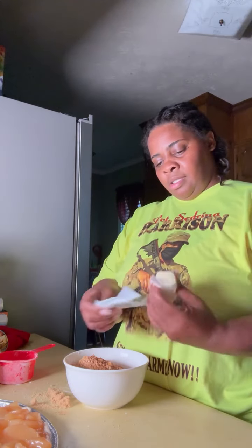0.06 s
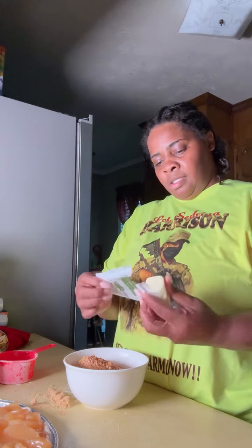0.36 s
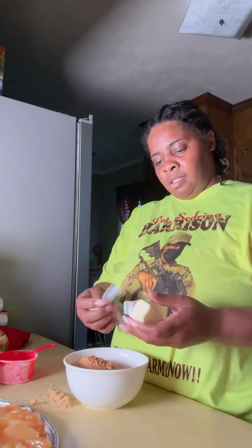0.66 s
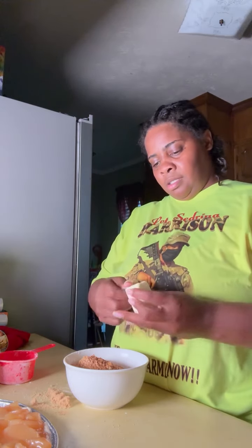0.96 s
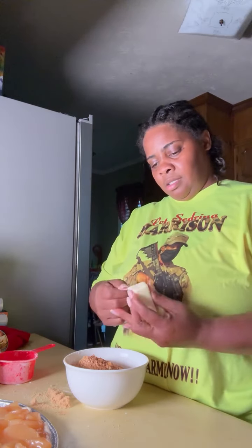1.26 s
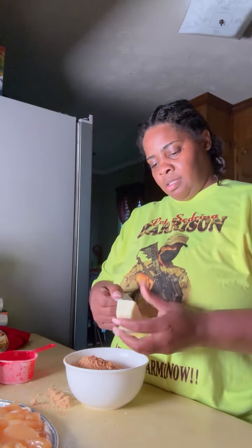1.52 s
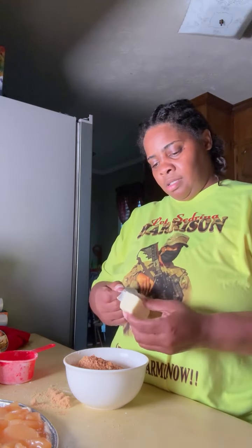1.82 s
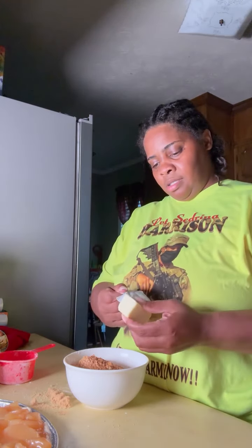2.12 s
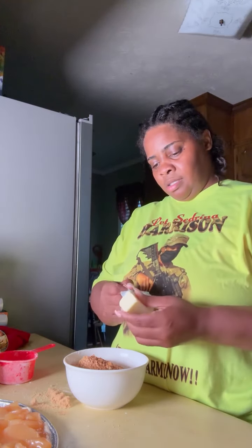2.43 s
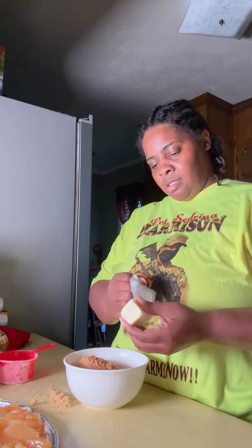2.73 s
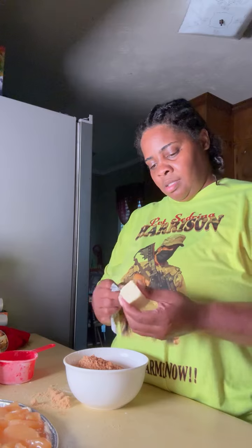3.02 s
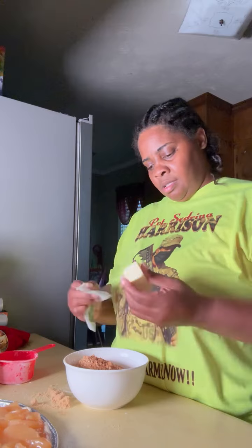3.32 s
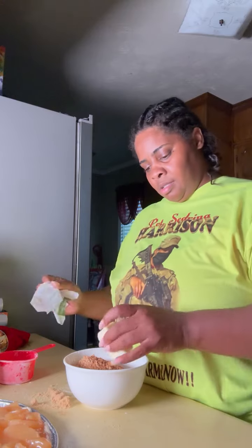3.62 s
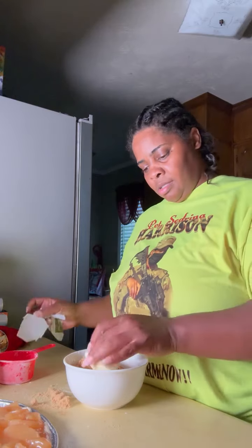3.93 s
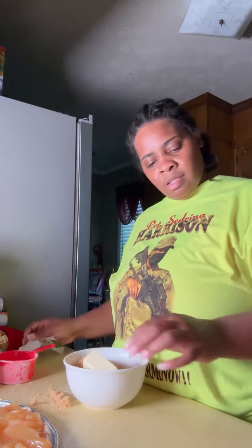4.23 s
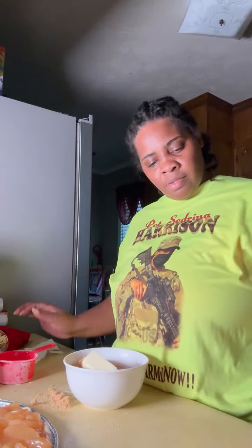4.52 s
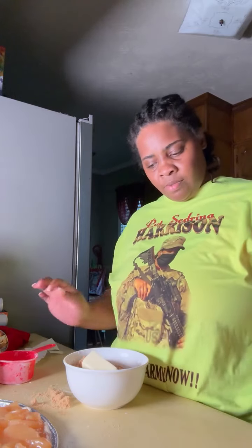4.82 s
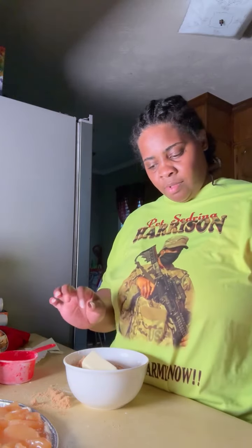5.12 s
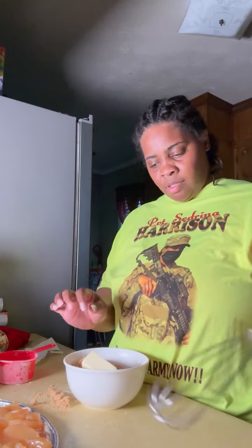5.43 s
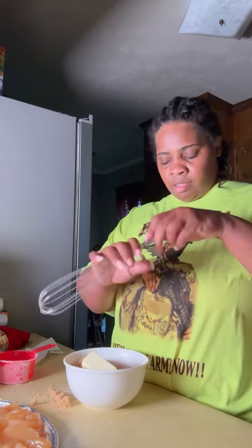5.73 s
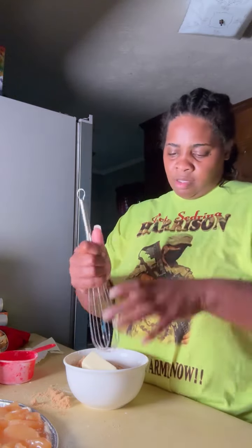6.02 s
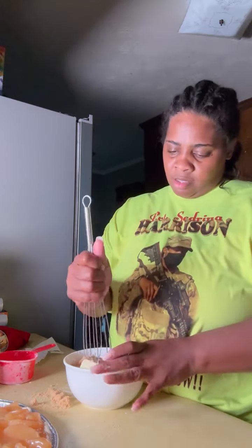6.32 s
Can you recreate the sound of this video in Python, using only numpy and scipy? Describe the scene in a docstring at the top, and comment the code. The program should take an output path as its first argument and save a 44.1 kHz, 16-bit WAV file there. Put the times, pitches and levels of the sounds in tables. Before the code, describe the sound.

Waxed paper tears quickly and crinkles off a butter stick, followed by light utensil knocks, with a fridge humming low throughout.

```python
"""Waxed paper is ripped off a stick of butter, then picked, peeled and crumpled in a small kitchen.
Its fibres fracture, its folds buckle with a click and its rubbed edges rasp by stick-slip friction.
The wrapper is laid aside, a metal utensil slides and knocks on the counter, exciting the modes of both,
and a whisk is picked up with light ticks and the brush of a sleeve. A fridge hums throughout.
The stereo width varies with frequency."""
import sys
import numpy as np
from scipy import signal
from scipy.fft import rfft, irfft, next_fast_len
from scipy.io import wavfile
from scipy.ndimage import map_coordinates

SR = 44100
rng = np.random.default_rng(int(sys.argv[2]) if len(sys.argv) > 2 else 0)


def master_out(mix):
    """Clip the mix to full scale and print it as 16-bit PCM to the path in sys.argv[1]."""
    frames = np.transpose(np.atleast_2d(mix))
    ceiling = np.clip(frames, -1, 1)
    pcm = np.round(ceiling * 32767).astype(np.int16)
    wavfile.write(sys.argv[1], SR, pcm)


N = 284886


def amp(db):
    return 10 ** (np.asarray(db) / 20)


def unit(x):
    """x at rms 1."""
    return x / np.sqrt(np.mean(x ** 2) + 1e-20)


def along(points, hz):
    """Interpolate (frequency [Hz], value) points on a logarithmic frequency axis."""
    f, v = np.transpose(points)
    return np.interp(np.log(hz + 1), np.log(f + 1), v)


def wobble(rate):
    """A smooth random curve with rate knots a second."""
    return map_coordinates(rng.standard_normal(int(N * rate / SR) + 4), [np.arange(N) * rate / SR])


def swell(start_s, length_s, attack_s, release_s):
    """Linear attack, hold until the length is over, then exponential decay of 60 dB in release_s."""
    t = np.arange(N) / SR - start_s
    return np.clip(t / attack_s, 0, 1) * amp(-60 * np.clip((t - length_s) / release_s, 0, 2))


def bell(s, width_s):
    """A Gaussian pulse of height 1 centred on s seconds."""
    return np.exp(-np.minimum(abs(np.arange(N) / SR - s) / width_s, 10) ** 2)


def filtered(x, response):
    """Linear filtering: the spectrum of x times a frequency response."""
    m = next_fast_len(x.shape[-1] + 8192)
    return irfft(rfft(x, m) * response(np.fft.rfftfreq(m, 1 / SR)), m)[..., :x.shape[-1]]


def coloured(x, spectrum):
    """x shaped by a (frequency [Hz], gain [dB]) curve, at rms 1."""
    return unit(filtered(x, lambda hz: amp(along(spectrum, hz))))


def band(x, lo_hz, hi_hz):
    """A causal Butterworth band-pass."""
    edges = [lo_hz, min(hi_hz, SR / 2 - 100)]
    return signal.sosfilt(signal.butter(3, edges, 'band', fs=SR, output='sos'), x)


def resonant(x, modes):
    """Modal superposition: x drives damped resonances of alternating sign; the sum is at rms 1."""
    return unit(filtered(x, lambda hz: sum(
        (-1) ** k * amp(db) * 1j * hz * width / (centre ** 2 - hz ** 2 + 1j * hz * width)
        for k, (centre, width, db) in enumerate(modes))))


def snaps(size, rate, spread_db):
    """A Poisson train of impulses, rate a second, most small and a few large."""
    impulses = (rng.random(size) < rate / SR) * rng.choice([-1, 1], size)
    return unit(impulses * amp(spread_db * np.minimum(rng.standard_normal(size), 2)))


def add(track, s, sound):
    """Mix a sound into the track at s seconds."""
    part = track[round(s * SR):][:len(sound)]
    part += sound[:len(part)]


# compressor and mains lines: (frequency [Hz], level [dB])
HUM_LINES = [(42, -66), (59, -58.5), (119.96, -55), (240, -80.5), (526.5, -81.5)]
# moving air: (frequency [Hz], spectral level [dB])
AIR_SPECTRUM = [(20, -36.5), (50, -16), (73, 6.5), (92, -11.5), (120, -2.5), (145, -14.5), (285, -15),
                (330, -22.5), (500, -30), (700, -42.5), (1100, -41), (4500, -45.5), (8000, -53),
                (15000, -54)]


def fridge():
    """Periodic forcing by compressor and mains gives a line spectrum, over air noise and a thin whine."""
    t = np.arange(N) / SR
    hum = np.zeros(N)
    for hz, db in HUM_LINES:
        level = amp(db + 0.6 * wobble(2.5))
        phase = 2 * np.pi * (hz * t + rng.random()) + 0.061 * wobble(0.79)
        hum += level * np.sqrt(2) * np.sin(phase)
    whine = amp(-82) * unit(band(rng.standard_normal(N), 3880, 4040))
    air = amp(-55) * coloured(rng.standard_normal(N), AIR_SPECTRUM)
    brief_dip = amp(-5.5 * bell(2.417, width_s=0.085))
    return brief_dip * (hum + air) + whine


# breaking fibres: (frequency [Hz], spectral level [dB])
TEAR_SPECTRUM = [(100, -16.5), (200, -6), (450, -6), (700, -7.5), (1100, -4.5), (1500, -3), (2000, -0.5),
                 (2800, -5.5), (4500, 0.5), (6500, -2), (9500, -1.5), (12000, -5.5), (15000, -6.5)]
# modes of the taut sheet: (frequency [Hz], bandwidth [Hz], gain [dB])
SHEET_MODES = [(449.4, 37, -3.5), (723, 50, -6), (1858, 140, -3), (1960, 70, -3.5), (2378, 46, 0.5),
               (2680, 40, 2), (2970, 37, -4), (3710, 72, -7.5)]
# the tear jumps ahead and tugs the sheet: (time [s], gain [dB], thump level [dB])
JERKS = [(0.02, 2.5, -33), (0.032, 3, -45.5), (0.053, 5.5, -39), (0.084, 2, -32)]


def rip():
    """Fracture: fibres break in one quick pull and excite the sheet's modes; each jerk adds a thump."""
    breaks = snaps(N, rate=7000, spread_db=3.5) * amp(2.5 * wobble(400))
    fibres = unit(band(coloured(breaks, TEAR_SPECTRUM), 160, 19000))
    ring = resonant(snaps(N, rate=2500, spread_db=3.5), SHEET_MODES)
    tugs = sum(amp(db) * bell(s, width_s=0.0033) for s, _, db in JERKS)
    thump = tugs * unit(band(rng.standard_normal(N), 190, 900))
    return pull(attack_s=0.02) * fibres + amp(-6.5) * pull(attack_s=0.0065) * ring + thump


def pull(attack_s):
    """Crack growth as an envelope: tension builds, the tear runs in jerks, and the paper parts."""
    start_s, length_s, release_s, rise_db_per_s = 0.011, 0.074, 0.049, 1899.5
    early_s = np.maximum(start_s - np.arange(N) / SR, 0)
    tighten = amp(-9 - rise_db_per_s * early_s) * swell(0, start_s, 0.0065, release_s)
    run = swell(start_s, length_s, attack_s, release_s)
    jerk_db = sum(db * bell(s, width_s=0.0052) for s, db, _ in JERKS)
    return amp(-23.5 + jerk_db) * np.maximum(tighten, run)


# fingers stroke paper, later counter and cloth:
# (time [s], duration [s], level [dB], relative hiss [dB], relative hollow body [dB])
STROKES = [(0.26, 0.059, -71, 2, -9), (0.458, 0.065, -70, 3, -11), (0.54, 0.17, -59.5, -0.5, -5.5),
           (0.719, 0.047, -52.5, 1, -9.5), (0.865, 0.11, -67, -3, -4), (0.932, 0.23, -70.5, 8.5, -27),
           (1.234, 0.044, -62.5, -22, -1.5), (1.741, 0.069, -62.5, -2.5, -3), (2, 0.036, -75.5, 9, 0),
           (2.417, 0.11, -73, -4.5, -9), (2.595, 0.075, -55.5, -14, -2.5), (2.703, 0.019, -61.5, -3, 12.5),
           (2.758, 0.081, -66.5, -7, -5), (2.854, 0.14, -64.5, 0.5, -0.5), (3.007, 0.016, -63, 7.5, -5),
           (3.069, 0.13, -67, -5.5, -5), (3.4, 0.028, -85, 12.5, 2), (3.516, 0.11, -75, -12, -20),
           (3.73, 0.062, -76.5, 1, -10), (3.914, 0.11, -80, 6, 0), (4.15, 0.033, -62.5, -5, -2),
           (4.181, 0.068, -57.5, 1, -13), (4.225, 0.2, -65.5, -0.5, -6), (4.421, 0.1, -70, 3.5, -0.5),
           (4.586, 0.2, -70, -5.5, 1.5), (4.823, 0.016, -66.5, -1, 12.5), (4.915, 0.15, -66, -1.5, 2.5),
           (5.552, 0.15, -75.5, -6, -4), (5.695, 0.12, -69.5, 9.5, -5), (5.888, 0.29, -71.5, -38, -2.5),
           (6.05, 0.31, -77.5, 3, -5)]


def handling():
    """Incoherent sources add in power: strokes and faint stirring set the middle, hiss and hollow gains."""
    release_s = 0.17
    held = swell(0.423, length_s=3.25, attack_s=0.026, release_s=release_s)
    stir = amp(-80 - 5 * wobble(23)) * held
    power = np.outer(amp([0, -3.5, -3.5]), stir) ** 2
    for s, length, db, hiss_db, hollow_db in STROKES:
        stroke = amp(db) * swell(s, length, 0.29 * length, release_s)
        power += np.outer(amp([0, hiss_db, hollow_db]), stroke) ** 2
    return np.sqrt(power)


FLAP_HZ, FLAP_WIDTH_HZ = 1998, 140  # resonance of the wrapper's loose flap
# the stiff sheet: (frequency [Hz], spectral level [dB])
PAPER_SPECTRUM = [(150, 6.5), (440, -2.5), (830, -3), (1150, -11), (1650, -3), (2000, -3), (2500, 6.5),
                  (3300, 0.5), (4500, -0.5), (6500, -1.5), (9500, -7.5), (15000, -8)]


def rustle():
    """Adhesion fails in clumps of tiny snaps as the paper peels, over friction noise; the flap rings."""
    middle_gain, hiss_gain, hollow_gain = handling()
    grains = snaps(N, rate=700, spread_db=2) * amp(4.6 * np.minimum(wobble(70), 1))
    sheet = coloured(unit(grains) + 0.84 * rng.standard_normal(N), PAPER_SPECTRUM)
    flicks = snaps(N, rate=500, spread_db=13.5)
    flap = amp(-8) * unit(band(flicks, FLAP_HZ - FLAP_WIDTH_HZ, FLAP_HZ + FLAP_WIDTH_HZ))
    hollow = unit(band(sheet, 241, 1410))
    middle = unit(band(sheet, 1430, 4980)) + flap
    hiss = unit(band(sheet, 7460, SR / 2))
    return hollow_gain * hollow + middle_gain * middle + hiss_gain * hiss


# a sudden snap: (frequency [Hz], spectral level [dB])
SNAP_SPECTRUM = [(200, -0.5), (450, -6), (1000, -10), (2000, 6), (5000, 5.5), (9500, -7), (15000, -11.5)]


def clicks(rows, t60_s, attack_s, ring_db, crack_db, gain_db, flap_db=0):
    """Impulse excitation: in each click a crack and an avalanche of snaps drive one damped resonance."""
    lead_s, reflection_s, q = 0.012, 0.0067, 13.3
    out, t = np.zeros(N), np.arange(SR // 10) / SR - lead_s
    after = np.maximum(t, 0)
    strain = amp(-17.5) * np.exp(-abs(t) / 0.0077)  # a few snaps come ahead of the crack
    decay = amp(-60 * after / t60_s) + 0.043 * amp(-60 * after / 0.2)
    envelope = decay * (1 - np.exp(-after / attack_s))
    crack = amp(crack_db) * unit(1.0 * (envelope == envelope.max()))
    for s, db, body_db, crisp_db, ring_hz in rows:
        avalanche = snaps(len(t), rate=9000, spread_db=4)
        burst = unit(envelope * avalanche + strain * band(avalanche, 460, 12100)) + crack
        ring_gain = amp(ring_db + flap_db * np.exp(-((ring_hz - FLAP_HZ) / FLAP_WIDTH_HZ) ** 2))
        ring = lambda hz: 1 + ring_gain * 1j * hz / (q * (ring_hz - hz ** 2 / ring_hz) + 1j * hz)
        click = filtered(burst, lambda hz: amp(along(SNAP_SPECTRUM, hz)) * ring(hz))
        low = amp(body_db) * unit(band(click, 290, 1160))
        reflection = amp(-10.5) * np.interp(t - reflection_s, t, low)  # dull, off the counter
        middle = unit(band(click, 1530, 5700))
        high = amp(crisp_db) * unit(band(click, 7830, SR / 2))
        add(out, s - lead_s, amp(db + gain_db) * (low + reflection + middle + high))
    return out


# folds of the wrapper give way:
# (time [s], level [dB], relative body [dB], relative crispness [dB], facet resonance [Hz])
CRINKLES = [(.5706, -38, -11.5, -30, 3650), (.6024, -42, -28, -20, 2640), (.7221, -29, -10.5, -3, 4550),
            (.7995, -37.5, -14, -9, 1960), (1.053, -47.5, -34, 1, 4500), (1.1316, -47.5, -21, 2, 3290),
            (1.2033, -25.5, -12, -2, 2930), (1.2401, -40, 0.5, -23, 1400), (1.3671, -31.5, -3, -4, 2700),
            (1.5247, -50, 5.5, -29, 1357), (1.5424, -39, 0, -28, 1850), (1.654, -46.5, -29, 0.5, 5170),
            (1.6802, -37.5, -13, -15, 2050), (1.7549, -44.5, -4, 2.5, 4350), (1.9748, -35, -13, -2, 2130),
            (2.0298, -45.5, -19, 0.5, 4300), (2.2539, -47.5, -13, -33, 2000),
            (2.3471, -39, -10.5, -5, 2050), (2.452, -50.5, -16, -6, 4550), (2.506, -44, -11, -30, 4160),
            (2.5533, -43.5, -15, -2, 4840), (2.5931, -36.5, -15, -5.5, 2180), (2.611, -43, -24, -13, 2300),
            (2.627, -40.5, -6, 5.5, 2090), (2.6574, -33.5, -10, 2.5, 10000), (2.672, -42, -11, 0, 5300),
            (2.7315, -31, -5.5, -7, 2650), (2.7404, -44.5, 3, -8, 2070), (2.874, -49, -12, -17, 1530),
            (2.9032, -36, -9.5, 4.5, 7100), (2.918, -31, -11.5, -8.5, 2840),
            (3.0478, -33.5, -16, -10, 4500), (3.0755, -31, -7, -11, 2900), (3.1533, -43, -4.5, -13, 2620),
            (3.5281, -52.5, -14, -20, 2850), (3.884, -58, -1, -5, 2205), (4.158, -56, 7.5, -14, 1870),
            (4.1747, -37, -9, 1.5, 2600), (4.215, -39, -14, 0, 5300), (4.3713, -42, -5, -1, 4530)]


def wrapper_crinkles():
    """Buckling: each fold snaps through and rings a facet, more strongly if it is tuned to the flap."""
    return clicks(CRINKLES, t60_s=0.02, attack_s=0.00036,
                  ring_db=10.5, crack_db=-13, gain_db=-23, flap_db=6)


# a rubbed edge of paper, later of metal, catches: (time [s], duration [s], level [dB], frequency [Hz])
RASPS = [(0.74, 0.034, -53, 2076), (0.96, 0.045, -67, 2276), (1.722, 0.03, -58.5, 2000),
         (4.753, 0.063, -55.5, 3430), (4.973, 0.037, -62.5, 4240), (5.01, 0.052, -62.5, 895)]


def rasps():
    """Stick-slip friction drives one unsteady resonance, whose pitch sinks as the pressure eases."""
    out, t = np.zeros(N), np.arange(N) / SR
    sag_per_s = 0.46  # share of the pitch
    jitter = 0.046 * wobble(900)
    grit = unit(amp(2.4 * wobble(300)))
    for s, length, db, hz in RASPS:
        pitch = hz * (1 - sag_per_s * (t - s - length / 2) + jitter)
        tone = np.sqrt(2) * np.sin(2 * np.pi * np.cumsum(pitch) / SR)
        out += amp(db) * swell(s, length, length / 2, release_s=0.067) * grit * tone
    return out


# hands and utensils strike the counter: (time [s], level [dB], cutoff frequency [Hz])
BUMPS = [(2.73, -50, 700), (2.877, -45.5, 644), (4.753, -52, 593), (4.893, -43.5, 450), (5.168, -41, 900),
         (6.074, -45.5, 379), (6.306, -34.5, 235)]
# modes of the counter: (frequency [Hz], level [dB], 60 dB decay time [s])
COUNTER_MODES = [(197, -2, 0.048), (308, -9.5, 0.042), (469, -1.5, 0.051), (760, 6.5, 0.029),
                 (1210, -4, 0.049), (1380, 0, 0.05), (2070, 2, 0.022), (3350, 7, 0.025)]


def bumps():
    """Impact: a blow thuds and sets the counter in free vibration; soft ones reach only its low modes."""
    out, t = np.zeros(N), np.arange(SR // 4) / SR
    scatter_db, thud_t60_s = 1.5, 0.056
    onset = 1 - np.exp(-t / 0.00195)
    for s, db, cutoff_hz in BUMPS:
        ring = np.zeros(len(t))
        for hz, mode_db, t60 in COUNTER_MODES:
            decay = amp(mode_db + scatter_db * rng.uniform(-1.1, 1) - 60 * t / t60)
            ring += decay / (1 + (hz / cutoff_hz) ** 4) * np.sin(2 * np.pi * hz * t)
        thud = amp(-2 - 60 * t / thud_t60_s) * unit(band(rng.standard_normal(len(t)), 145, cutoff_hz))
        add(out, s, amp(db) * (ring + thud) * onset)
    return out


# a metal utensil is dragged in shoves: (time [s], duration [s], scrape level [dB], ring level [dB])
SHOVES = [(4.737, 0.062, -58, -57), (4.81, 0.032, -50.5, -52), (4.955, 0.069, -56.5, -57)]
# rough contact: (frequency [Hz], spectral level [dB])
SCRAPE_SPECTRUM = [(150, -10), (400, 5), (700, -6), (1400, 0), (2500, -17), (3500, -4), (4300, -12),
                   (6500, -12.5), (15000, -24.5)]
# modes of the utensil: (frequency [Hz], bandwidth [Hz], gain [dB])
UTENSIL_MODES = [(852, 31, 0.5), (1063, 43, -0.5), (1445, 48, -11), (2000, 56, 1.5), (2500, 105, -1.5),
                 (3350, 140, -5.5), (4270, 49, -8)]


def slide():
    """Sliding friction: tiny collisions with grit make a scrape and excite the utensil's modes."""
    scrape, ring = np.zeros((2, N))
    for s, length, scrape_db, ring_db in SHOVES:
        shove = swell(s, length, 0.53 * length, release_s=0.24)
        scrape += amp(scrape_db) * shove
        ring += amp(ring_db) * shove
    friction = snaps(N, rate=1200, spread_db=3.5) * amp(4.9 * wobble(110))
    return scrape * coloured(friction, SCRAPE_SPECTRUM) + ring * resonant(friction, UTENSIL_MODES)


# utensils tick: (time [s], level [dB], relative body [dB], relative crispness [dB], resonance [Hz])
TICKS = [(4.7518, -33, -1, -14, 2920), (4.8908, -37.5, -3, 5, 2070), (5.039, -38.5, -12, -16.5, 2500),
         (5.1662, -31, -1.5, -17.5, 2050), (5.7641, -51, -16, 17, 4170), (5.772, -55, -14, 10, 2970),
         (5.7936, -49.5, -12, 10.5, 3900)]


def utensil_ticks():
    """Hard impact: a short contact gives a broadband click and rings the utensil briefly."""
    return clicks(TICKS, t60_s=0.015, attack_s=0.00019, ring_db=5, crack_db=-9, gain_db=-27.5)


def sleeve():
    """Friction noise: cotton brushes dully against the body as the arm moves."""
    brush = swell(5.91, length_s=0.095, attack_s=0.095, release_s=1)
    return amp(-64.5) * brush * unit(band(rng.standard_normal(N), 133, 440))


# decay of the kitchen: (frequency [Hz], reverberation time [s])
ROOM_DECAY = [(150, 0.51), (500, 0.38), (2000, 0.33), (5000, 0.35), (15000, 0.23)]


def echo():
    """Reverberation: counter and cupboards reflect first, then walls; decay time depends on frequency."""
    hz, t, spectra = signal.stft(rng.standard_normal(SR // 2), SR, nperseg=256)
    decay = amp(-60 * t / along(ROOM_DECAY, hz)[:, None])
    tail = signal.istft(spectra * decay, SR, nperseg=256)[1]
    age = np.arange(len(tail)) / SR
    onset = 1 - np.exp(-age / 0.0018)
    early_boost = 1 + 3.1 * np.exp(-age / 0.014)
    tail = tail * onset * early_boost
    return tail / np.linalg.norm(tail)


def kitchen(x):
    """Convolution reverberation, with a fresh tail every third of a second so no pitch keeps ringing."""
    out, hop = np.zeros(N), SR // 3
    for start in range(0, N, hop):
        add(out, start / SR, signal.fftconvolve(x[start:start + hop], echo()))
    return out


# stereo width: (frequency [Hz], side gain relative to mid [dB])
STEREO_WIDTH = [(60, -57.5), (400, -7.5), (720, -3), (1350, 0), (2050, -10.5), (2700, -0.5), (3800, -13.5),
                (4900, 0.5), (6750, 2.5), (7100, 20), (7750, 19.5), (7950, 0), (11500, -7), (12500, -3.5),
                (15500, 8)]


def scene():
    """Superposition in mid-side stereo: each signal has reflections and fridge noise of its own."""
    clicking = wrapper_crinkles() + utensil_ticks()
    direct = clicking + amp(-1) * rip() + rustle() + slide() + bumps() + sleeve() + rasps()
    quadrature = filtered(direct, lambda hz: -1j)  # a 90 degree phase lag
    mid = direct + amp(-4) * kitchen(direct) + fridge()
    side = amp(-2) * quadrature + amp(-4) * kitchen(direct) + fridge()
    angle = lambda hz: np.arctan(amp(along(STEREO_WIDTH, hz)))
    mid = filtered(mid, lambda hz: np.cos(angle(hz)))
    side = filtered(side, lambda hz: np.sin(angle(hz)))
    return np.array([mid + side, mid - side])


def record(dry):
    """Band limiting: the phone on the counter acts as a steep low-pass filter."""
    cutoff_hz = 15700
    return filtered(dry, lambda hz: 1 / np.sqrt(1 + (hz / cutoff_hz) ** 160))


dry = scene()
out = record(dry)
master_out(out)
```